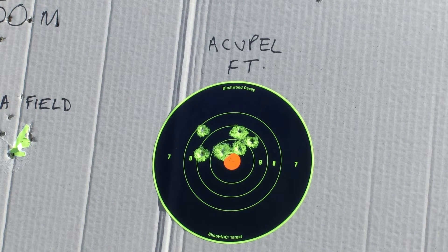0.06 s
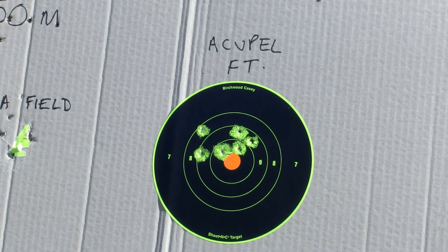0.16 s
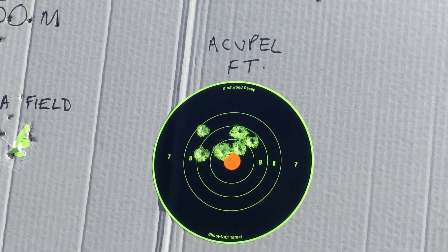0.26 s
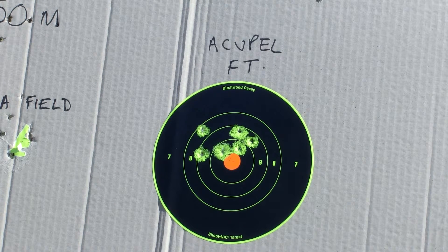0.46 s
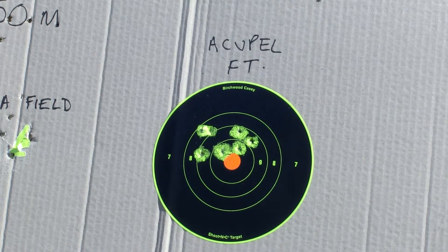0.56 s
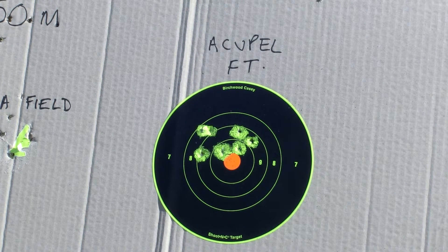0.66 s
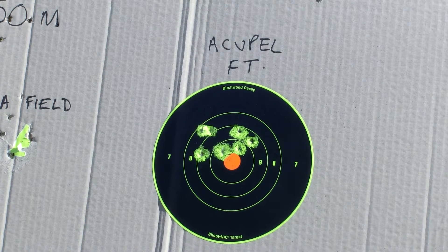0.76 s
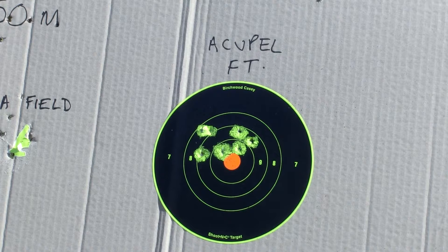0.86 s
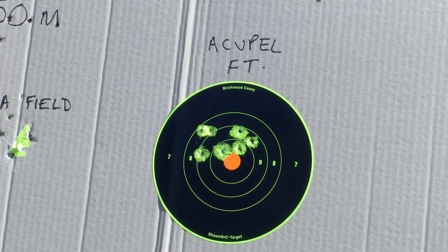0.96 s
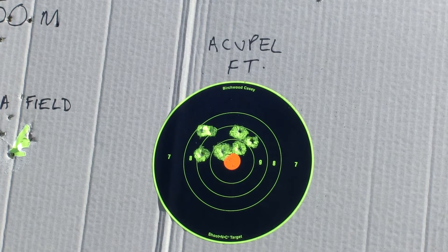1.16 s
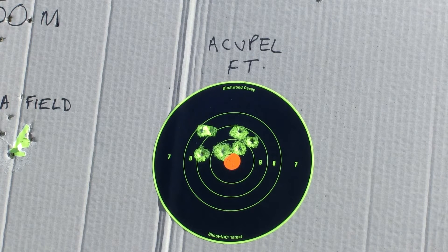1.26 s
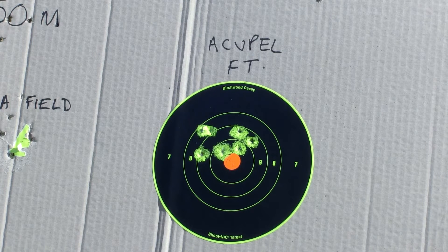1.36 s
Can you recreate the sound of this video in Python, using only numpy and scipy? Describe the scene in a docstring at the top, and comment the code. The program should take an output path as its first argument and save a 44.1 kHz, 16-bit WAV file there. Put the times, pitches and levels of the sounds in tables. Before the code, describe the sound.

A distant air rifle cracks, then its pellet hisses in and smacks loudly through a cardboard target

```python
"""Wind buffets the microphone over a far outdoor murmur; then an air rifle is fired far down a garden range.
The recordist stands beside the cardboard target: the report arrives first, then the pellet hisses closer,
passes and punches through the card, and the surroundings echo.
Wind, murmur, hiss and echoes are filtered noise; the sharp cracks are filtered pulses; the card rings in sines.
The recorder turns its gain down at loud peaks and holds it there."""
import sys
import numpy as np
from scipy import signal
from scipy.fft import rfft, irfft, next_fast_len
from scipy.io import wavfile
from scipy.ndimage import uniform_filter1d, minimum_filter1d, map_coordinates

SR = 44100
rng = np.random.default_rng(int(sys.argv[2]) if len(sys.argv) > 2 else 0)


def output_pcm(signal):
    """Save a mono or channel-first signal as 16-bit PCM at the path in sys.argv[1].

    Samples are clipped to [-1, 1] before scaling.
    """
    pcm = np.clip(np.atleast_2d(signal).T, -1, 1) * 32767
    wavfile.write(sys.argv[1], SR, np.round(pcm).astype(np.int16))


N = 61739  # samples, 1.4 s

REPORT_S, SLAP_S = .35945, .5493  # the report arrives; the pellet leaves the back of the card (s)
TOP_HZ = 15400  # top of the recorder's range

# left-right likeness of distant, spread-out sound: [f/Hz, likeness -1 to 1]
FAR_LIKENESS = [(100, 1), (900, .9), (3500, .75), (8000, 0.26), (15000, .2)]
# left-right likeness of sound close to the microphone: [f/Hz, likeness -1 to 1]
NEAR_LIKENESS = [(200, 0.73), (1000, .85), (4000, .55), (15000, 0.27)]


def amp(db):
    """Decibels to gain."""
    return 10 ** (np.asarray(db) / 20)


def unit(x):
    """x scaled to rms 1."""
    return x / np.sqrt(np.mean(x ** 2) + 1e-20)


def clock():
    """The time of each sample (s)."""
    return np.arange(N) / SR


def along(points, hz):
    """(f/Hz, value) points read on a log frequency axis."""
    f, v = np.transpose(points)
    return np.interp(np.log(hz + 1), np.log(f + 1), v)


def band(centre_hz, octaves):
    """A rounded hump as (f/Hz, level/dB) points; its power is down to 1/e at the given octaves from the centre."""
    steps = np.linspace(-10, 10, 81)  # octaves from the centre
    level_db = -10 / np.log(10) * (steps / octaves) ** 2
    return np.transpose([centre_hz * 2 ** steps, np.maximum(level_db, -100)])


def coloured(x, spectrum):
    """x through a causal minimum-phase filter with the given (f/Hz, level/dB) points."""
    m = 2 * next_fast_len(N)
    log_gain = np.log(amp(along(spectrum, np.fft.rfftfreq(m, 1 / SR))))
    # folding the cepstrum onto positive times makes the filter causal
    cepstrum = irfft(log_gain, m)
    cepstrum[1:m // 2] *= 2
    cepstrum[m // 2 + 1:] = 0
    return irfft(rfft(x, m) * np.exp(rfft(cepstrum)), m)[..., :N]


def filtered(x, response):
    """x times a response of frequency."""
    m = 2 * next_fast_len(N)
    return irfft(rfft(x, m) * response(np.fft.rfftfreq(m, 1 / SR)), m)[..., :N]


def noise(alike):
    """White stereo noise with the given left-right likeness, mixed from independent mid and side."""
    def mid_side_gain(hz):
        turn = np.arccos(np.clip(along(alike, hz), -1, 1)) / 2
        return np.array([np.cos(turn), np.sin(turn)])

    mid, side = filtered(rng.standard_normal((2, N)), mid_side_gain)
    return np.array([mid + side, mid - side])


def wobble(rate):
    """A smooth random curve with rate knots a second."""
    return map_coordinates(rng.standard_normal(N), [clock() * rate])


def placed(x, s, db):
    """x scaled to the given energy per port (dB), then shifted to start at time s."""
    x = unit(x) * amp(db) / np.sqrt(N)
    return np.pad(np.broadcast_to(x, (2, N)), ((0, 0), (round(s * SR), 0)))[:, :N]


def snap(spectrum, low_s, high_s):
    """One coloured pressure pulse whose delay runs from low_s in the bass to high_s at the top."""
    def spread(hz):
        return np.exp(-2j * np.pi * hz * (low_s + (high_s - low_s) * hz / (2 * TOP_HZ)))

    return filtered(coloured(signal.unit_impulse(N), spectrum), spread)


def burst(spectrum, length_s, alike):
    """A short gated puff of coloured noise."""
    gate = np.exp(-(clock() / length_s) ** 4)
    return coloured(noise(alike) * gate, spectrum)


def tail(spectrum, t60, attack_s, alike):
    """Grainy scatter that swells and dies away; t60 is the time (s) to decay by 60 dB."""
    t = clock()
    grains = noise(alike) * amp(1.9 * wobble(rate=700))
    swell = 1 - np.exp(-t / attack_s)
    return coloured(grains, spectrum) * 1000 ** (-t / t60) * swell


def wind():
    """Turbulence at the microphone: low buffeting, different at each port, with stronger rounded eddies."""
    # strength of the wind on the microphone: [t/s, level/dB, left minus right/dB]
    gusts = [(0, -33.5, -2), (.06, -37.5, -7), (.1, -44, -4), (.17, -41.5, -7.5), (0.211, -32, 2.5),
             (.3, -34.5, 5.5), (.34, -31, -5.5), (.39, -31, 4.5), (.5, -32.5, 1.5), (.6, -42, -1),
             (.71, -50, 3), (.75, -41.5, 3.5), (.79, -50.5, 2), (.9, -49.5, 6.5), (.96, -42, 2),
             (1.12, -43.5, 4), (1.24, -32.5, 7.5), (1.33, -47, 3), (1.4, -46.5, -2)]
    # colour of the buffeting: [f/Hz, level/dB]
    buffet = [(20, -5), (45, -4.5), (72, -0.5), (130, -9), (220, -20), (400, -34), (900, -54.5),
              (3000, -90)]
    # single eddies that thump the ports: [centre t/s, energy of both ports/dB, f/Hz, share on the right 0-1]
    eddies = [(.189, 0.5, 184, 0.98), (.214, -2.5, 231, 0.03), (.222, 4, 65, 0), (.264, -3.5, 160, 0.8),
              (.293, -2, 153, 0), (.75, -10.5, 60, .35), (.946, -11, 91, 0.1), (1.24, -2.5, 79.5, 0.19),
              (1.287, -11, 220, .35), (1.303, -16, 160, 0.27)]
    t = clock()
    times, *columns = np.transpose(gusts)
    level_db, side_db = [np.interp(t, times, c) for c in columns]
    port_db = level_db + 1.1 * wobble(rate=35) + side_db * np.array([[.5], [-.5]])
    rumble = unit(coloured(noise([(60, 0.087)]), buffet)) * amp(port_db)
    for s, db, hz, right in eddies:
        cycles = (t - s) * hz
        swirl = np.sin(2 * np.pi * cycles) / (1 + (cycles / 0.73) ** 2) ** 2
        rumble = rumble + placed(swirl, 0, db) * np.sqrt([[1 - right], [right]])
    return rumble


def background():
    """The steady far murmur of the outdoors and the microphone's own hiss, both filtered noise."""
    # colour of the far murmur: [f/Hz, level/dB]
    outdoors = [(100, 1.5), (300, -1.5), (550, -2), (850, 4.5), (1150, 0.5), (1700, -10), (2600, -19.5),
                (5000, -23), (15000, -38.5)]
    # colour of the microphone's own noise: [f/Hz, level/dB]
    mic_hiss = [(500, -0.5), (4000, -3), (9000, -3.5), (15000, -6)]
    outdoors_db, mic_hiss_db = -57, -63.5  # rms levels
    far = unit(coloured(noise(FAR_LIKENESS), outdoors)) * amp(outdoors_db)
    own = unit(coloured(rng.standard_normal((2, N)), mic_hiss)) * amp(mic_hiss_db)
    return far + own


def report():
    """The muzzle's single sharp pressure pulse and its scatter from the garden."""
    # colour of the muzzle pulse: [f/Hz, level/dB]
    muzzle = [(30, -18), (150, -6.5), (300, -3), (500, -10), (1300, -2.5), (2000, -7), (2900, -0.5),
              (4700, 2.5), (7500, -11.5), (9200, -3.5), (11300, -20.5), (15000, -18)]
    # colour of the garden's scatter: [f/Hz, level/dB]
    garden = [(50, -6), (280, 6.5), (500, -2.5), (900, -1), (1500, -6.5), (3000, -8), (7000, -12),
              (14000, -19.5)]
    pulse = placed(snap(muzzle, low_s=.00003, high_s=.0004), REPORT_S, db=17)
    scatter = tail(garden, t60=.24, attack_s=.003, alike=FAR_LIKENESS)
    return pulse + placed(scatter, REPORT_S, db=4.0)


def flight():
    """The pellet's fluttering hiss grows as it nears and drops once past; its duller wake shows only close by."""
    # colour of the pellet's hiss: [f/Hz, level/dB]
    hiss_colour = [(200, -12.5), (1200, -15), (3000, -13.5), (4500, -10), (6000, -4.5), (6900, -6),
                   (9000, -1.5), (11000, 0), (15000, -6.5)]
    # colour of the wake: [f/Hz, level/dB]
    wake_colour = [(50, 3), (350, 3.5), (1500, -5), (4200, -2), (7000, -16.5), (15000, -23.5)]
    pass_s, pass_db = .5325, -9  # closest moment (s), hiss level there (dB)
    near_s, recede = .008, 2.4  # time to cover the miss distance on approach (s), speed-up once past
    spread = 1.11  # power of the fall with distance
    t = clock()
    pace = np.where(t > pass_s, recede, 1)
    distance = np.hypot(1, (t - pass_s) / near_s * pace)  # in miss distances
    flying = np.clip((t - REPORT_S) / .01, 0, 1) * np.clip((SLAP_S - t) / .002, 0, 1)
    flutter = amp(pass_db + .8 * wobble(rate=250))
    hiss = unit(coloured(noise(NEAR_LIKENESS), hiss_colour)) * flutter / distance ** spread
    wake = unit(coloured(noise(FAR_LIKENESS), wake_colour)) * amp(-18)
    wake = wake / (1 + ((t - pass_s) / 0.0029) ** 2)
    return flying * (hiss + wake)


def echoes():
    """Short smeared ticks of noise for the echoes off rough surfaces."""
    # echoes from the ground, fences and walls: [t/s, energy/dB, centre f/Hz, width/octaves, gate length/s]
    returns = [(.366, 5.5, 780, 1.49, 0.0023), (.3715, 2, 5500, 0.59, 0.0038),
               (0.595, -11.5, 3500, 0.92, .004), (.602, 1.5, 10000, 1.9, 0.00258),
               (.615, -4, 8000, 2.3, 0.0043), (0.629, -19, 6030, 1.8, 0.0022),
               (0.653, -16.5, 2600, 1.4, 0.006), (.674, -18.5, 3500, 1.8, 0.0047),
               (0.731, -25.5, 9800, 0.28, 0.0044), (0.742, -29.5, 5500, 0.88, .008),
               (0.8363, -26, 2500, .8, .0025)]
    ticks = np.zeros((2, N))
    for s, db, hz, octaves, length_s in returns:
        ticks += placed(burst(band(hz, octaves), length_s, FAR_LIKENESS), s, db)
    return ticks


def hit():
    """The pellet rips the face and slaps through the back; the board flexes and rings, and the garden answers."""
    # colour of the tearing face: [f/Hz, level/dB]
    tear = [(30, -14.5), (150, -8), (330, -8.5), (550, -11), (1000, -14.5), (2200, -8.5), (3200, -2),
            (4600, -3), (7300, -13.5), (8600, -1), (9900, -8.5), (11300, 4.5), (13200, -6), (15000, -8)]
    # colour of the slap through the back: [f/Hz, level/dB]
    back = [(30, -10), (150, -4.5), (330, -6), (550, -10), (900, -3), (1700, 1.5), (3200, -4.5),
            (4700, 0.5), (7000, -5), (9000, -15), (15000, -19.5)]
    # ringing modes of the card: [f/Hz, level/dB, t60/s before the shared fade]
    modes = [(503, -10, 0.066), (1097, -6, 0.012), (1793, -5, 0.074), (2800, -6.5, 0.037),
             (3650, -3, 0.032), (4393, -15.5, 0.054), (4700, -3.5, 0.027)]
    # colour of the board's rattle: [f/Hz, level/dB]
    board = [(25, -12), (100, -1.5), (330, -4), (550, -3), (850, -2.5), (1250, 1), (2200, -1), (3500, -6.5),
             (7000, -7), (9000, -10), (12000, -5.5), (15000, -9)]
    # colour of the garden's answer: [f/Hz, level/dB]
    garden_colour = [(100, -2), (500, -4), (1300, -7.5), (2500, -2), (4200, 0.5), (7000, -3), (11000, -1.5),
                     (15000, -5.5)]
    # colour of the slower, more distant answer: [f/Hz, level/dB]
    distant_colour = [(200, -20), (1200, -8), (2500, -0.5), (5000, -0.5), (9000, -9.5), (15000, -20)]
    hit_s, tear_s = .5469, .0012  # moment of the hit, length of the tear (s)
    push_hz, push_t60 = 95, 0.03  # the whole board flexing: pitch (Hz), 60 dB decay (s)
    t = clock()
    crack = placed(snap(tear, low_s=tear_s, high_s=.0001), hit_s, db=26)
    rip = placed(burst(tear, tear_s, NEAR_LIKENESS), hit_s, db=20.5)  # torn fibres
    push = placed(np.sin(2 * np.pi * push_hz * t) * amp(-60 * t / push_t60), hit_s, db=3)
    rattle = placed(tail(board, t60=0.024, attack_s=.0005, alike=FAR_LIKENESS), hit_s + tear_s, db=18)
    slap = placed(snap(back, low_s=.00005, high_s=.0005), SLAP_S, db=16)
    ring = sum(amp(db - 60 * t / t60) * np.sin(2 * np.pi * hz * t) for hz, db, t60 in modes)
    ring = placed(ring * np.exp(-t / 0.011), SLAP_S, db=4.5)
    garden = placed(tail(garden_colour, t60=.335, attack_s=.004, alike=FAR_LIKENESS), SLAP_S, db=.8)
    distant = placed(tail(distant_colour, t60=.8, attack_s=.05, alike=FAR_LIKENESS), SLAP_S, db=-16.5)
    return crack + rip + push + rattle + slap + ring + garden + distant


def scene():
    """The shot reaches the left port a moment earlier and the right one a little louder, amid wind and murmur."""
    port_lag_s = 1.7e-5
    early_late = np.array([[1], [-1]])
    shot = report() + flight() + echoes() + hit()
    shot = filtered(shot, lambda hz: np.exp(1j * np.pi * hz * port_lag_s * early_late))
    return wind() + background() + shot * amp([[-.6], [.6]])


def record(dry):
    """Loud peaks pull the gain down and it stays down; what is still too loud clips; the top is cut off."""
    threshold_db, max_cut_db = -13, 12
    over_db = 20 * np.log10(np.abs(dry).max(0) + 1e-9) - threshold_db
    # largest need in a centred window, so the gain starts to fall just ahead of a peak
    need_db = -minimum_filter1d(-np.clip(over_db, 0, max_cut_db), size=400)
    cut_db = np.maximum.accumulate(need_db)  # no recovery
    clipped = np.clip(dry * amp(-uniform_filter1d(cut_db, size=300)), -1, 1)
    return filtered(clipped, lambda hz: 1 / np.sqrt(1 + (hz / TOP_HZ) ** 140))


dry = scene()
out = record(dry)
output_pcm(out)
```